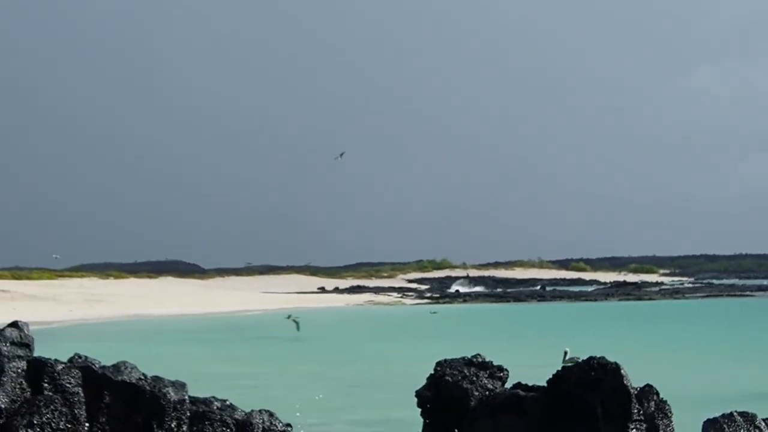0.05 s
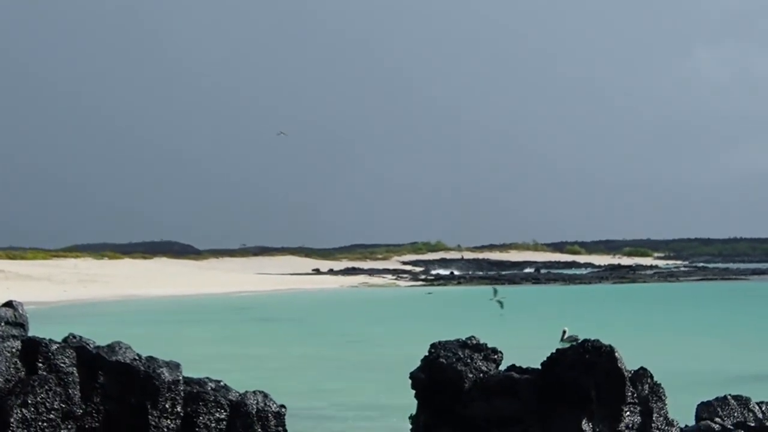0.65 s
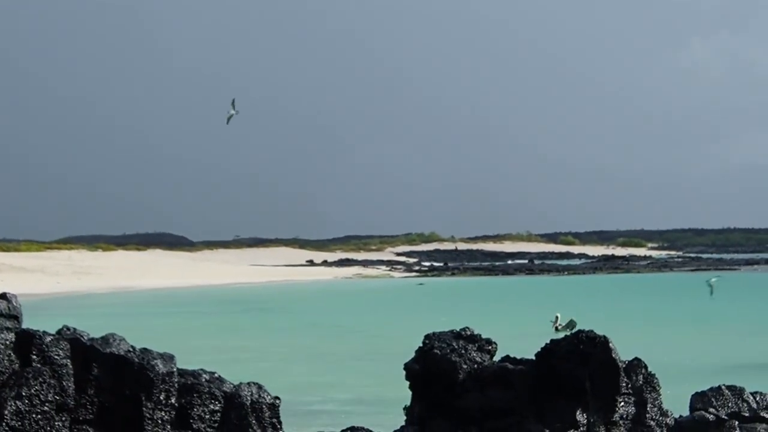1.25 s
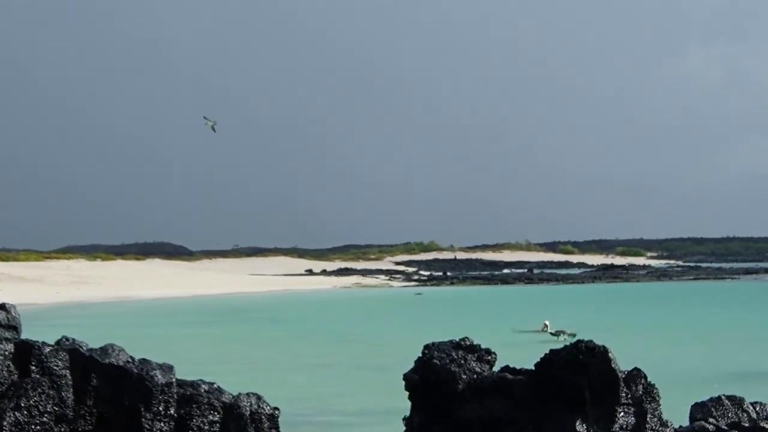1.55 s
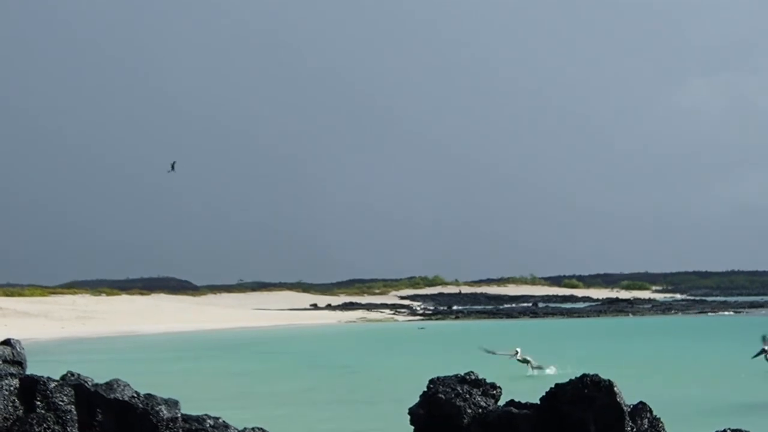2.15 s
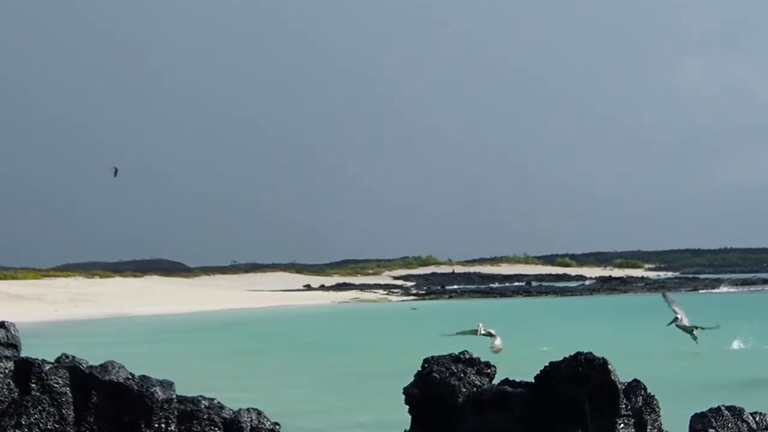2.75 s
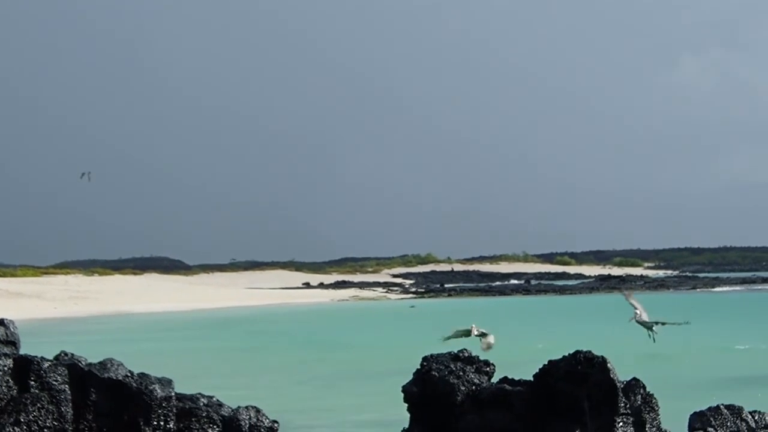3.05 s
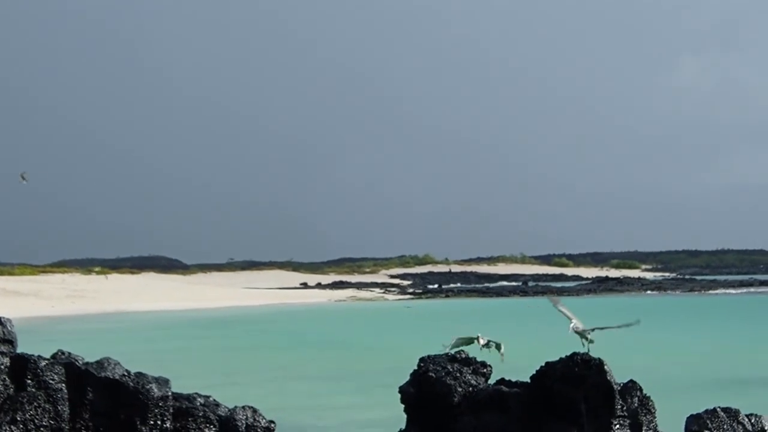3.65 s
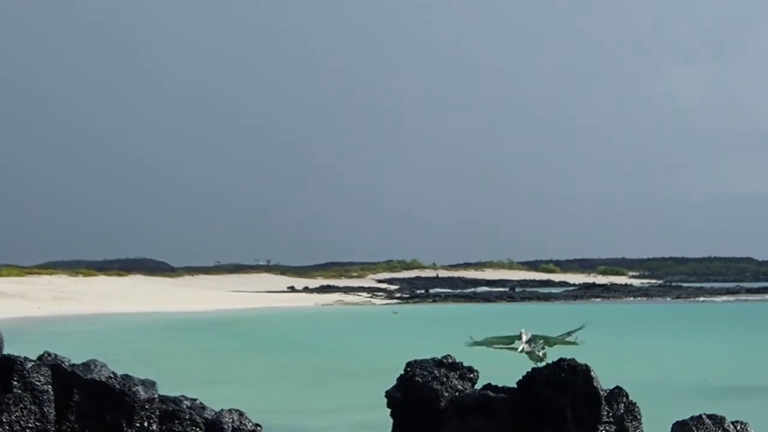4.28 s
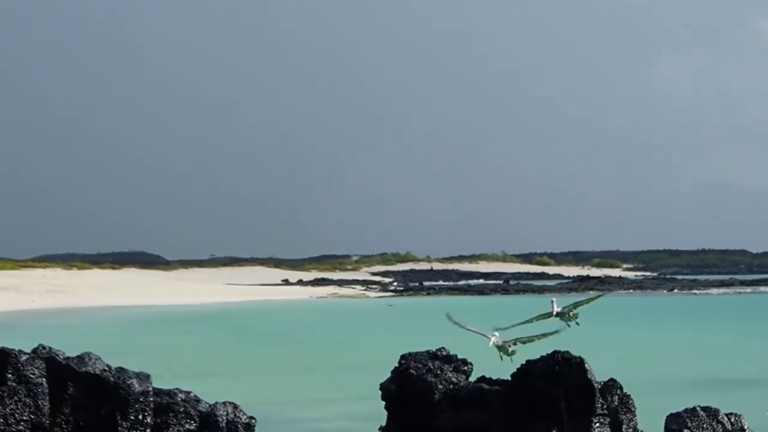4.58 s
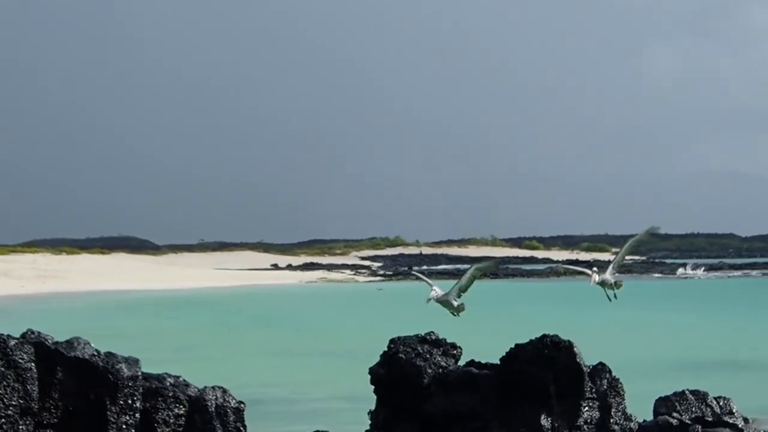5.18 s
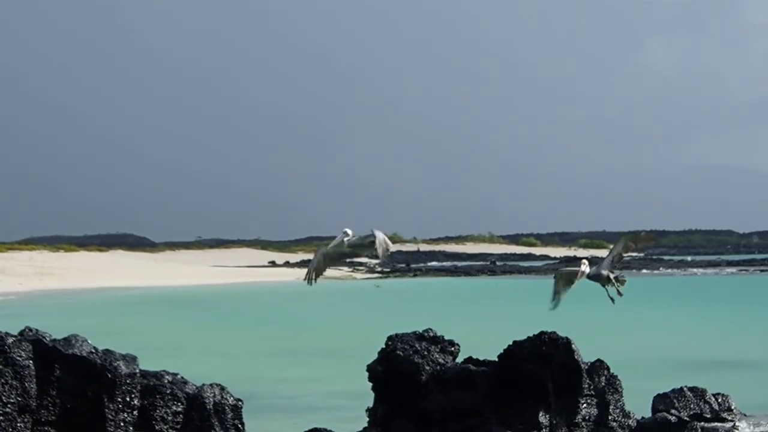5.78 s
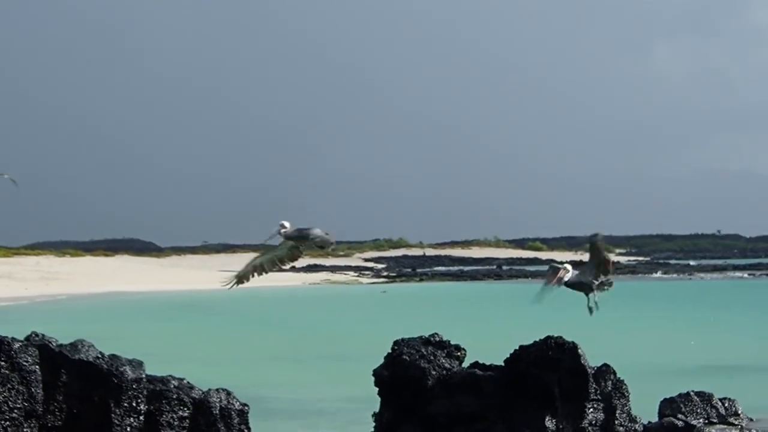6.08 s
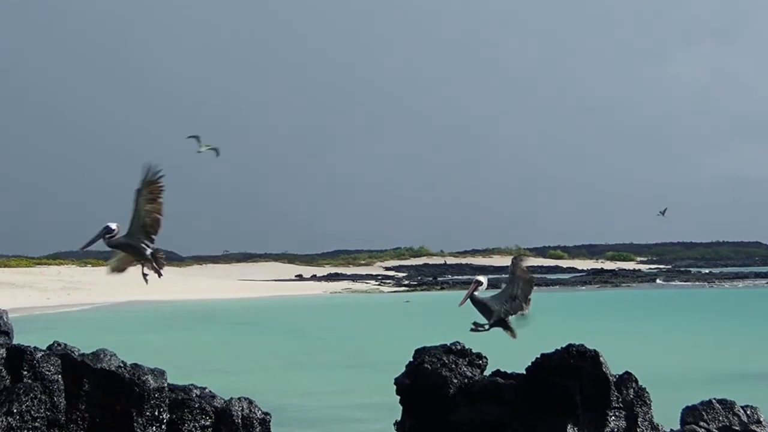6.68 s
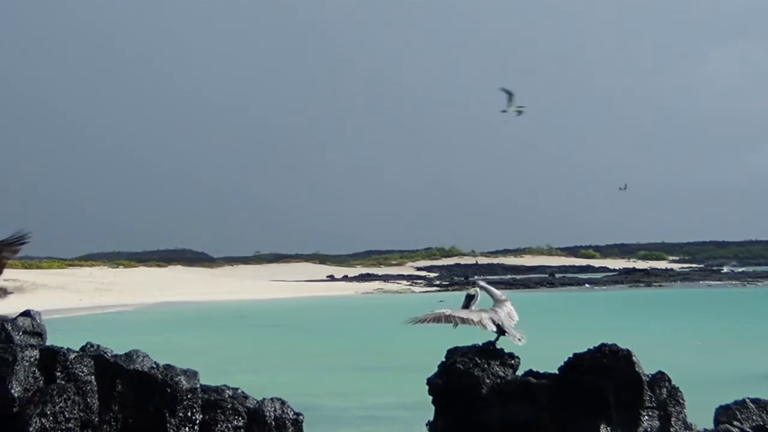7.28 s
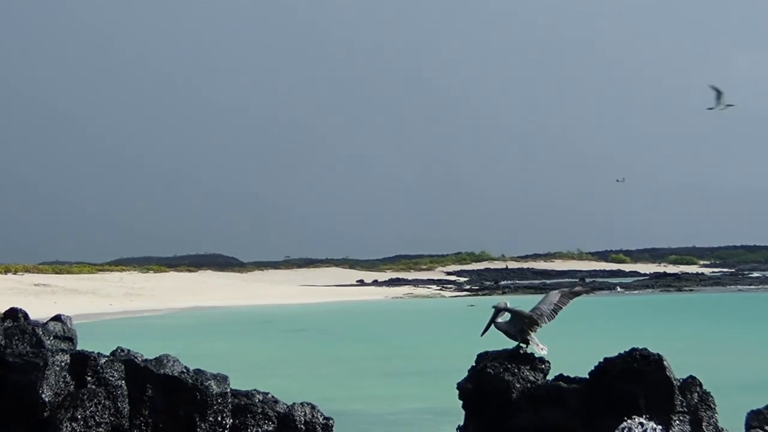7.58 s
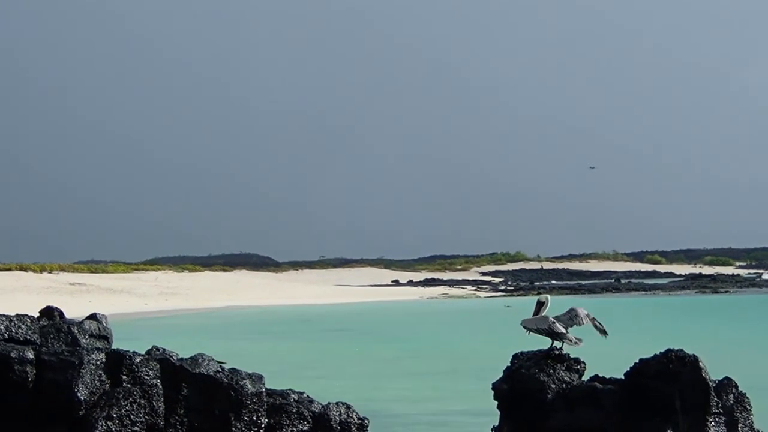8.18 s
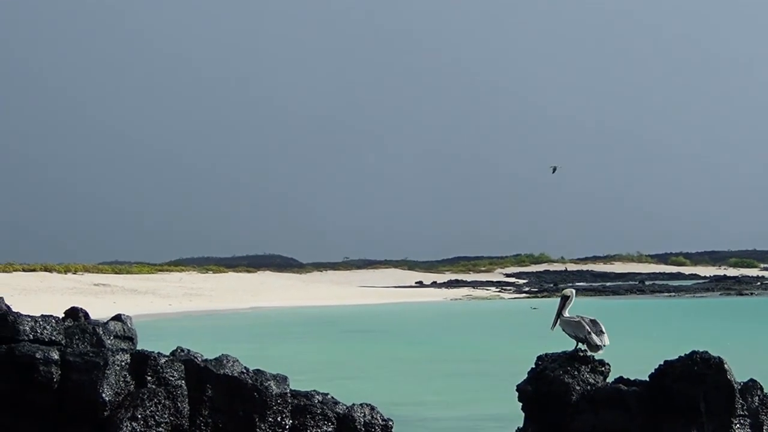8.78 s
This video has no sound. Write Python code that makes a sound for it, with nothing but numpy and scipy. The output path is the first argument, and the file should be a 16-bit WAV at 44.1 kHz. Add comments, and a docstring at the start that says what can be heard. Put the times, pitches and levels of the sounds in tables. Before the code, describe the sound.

Surf washes over shore rocks, heard through a wet microphone housing that makes it hollow and puts it mostly on the left; the right carries faint hiss and low wind rumble. The first wave surges immediately and holds until about 1.3 seconds, bubbling and fizzing, with brief slaps and low gulps. It drains into quieter foam while gusts buffet the microphone. A second, softer wave rises around 4 seconds, with slaps, gulps and tiny ticks of spray, then fades by 5. Wind gusts again through the lull. The third wave builds near 7 seconds and keeps washing until the end at about 9, with more slaps and a deeper churn and gulps just after 8. Throughout, single drops hit the housing with dull pops, the strongest at about 2.6 seconds on the left and 5.2 seconds on the right.

```python
"""Waves surge over shore rocks; foam fizzes and wind buffets between them. Each wave is a few overlapping
surges that rise, hold and drain: a cloud of ringing bubbles, with spray above and gulps of trapped air below.
The microphone sits in a wet housing: the left port rings, the right is nearly sealed, and drops pop on both."""
import sys
import numpy as np
from scipy import signal
from scipy.fft import rfft, irfft
from scipy.io import wavfile

SR = 44100
rng = np.random.default_rng(int(sys.argv[2]) if len(sys.argv) > 2 else 0)


def unload_audio(sound):
    """Save the sound as a 16-bit wav file, at the path given as the first command line argument."""
    columns = np.transpose(np.atleast_2d(sound))
    # keep every value between -1 and 1, then stretch to whole-number steps
    steps = np.round(np.clip(columns, -1, 1) * 32767)
    wavfile.write(sys.argv[1], SR, steps.astype(np.int16))


N = 398655

# breaking wave through the housing: (frequency [Hz], relative level [dB])
BREAKER_SPECTRUM = [(250, -33), (470, -9), (590, -8), (690, -10), (820, -1), (1000, -2.5), (1350, 0),
                    (1580, 1.5), (1800, -2.5), (2000, -8.5), (2200, -10), (2570, -22.5), (3200, -39),
                    (4500, -67)]
# spray through the housing: (frequency [Hz], relative level [dB])
SPRAY_SPECTRUM = [(2000, -2), (3160, -7.5), (3620, -3.5), (4170, -8), (4880, -2.5), (5800, -7), (6450, 0.5),
                  (6800, 0.5), (7650, -13.5), (8600, -6.5), (9400, -16), (10200, -39), (11200, -72)]


def surf(churn_lag_s=0.031):
    """Surges drive wash, spray and churn; foam lingers, large bubbles surface late and stop first."""
    # (start [s], rise [s], hold [s], wash [dB], spray [dB], churn [dB]), before port gain
    surges = [(-0.1, 0.15, 0.16, -25.5, -40.5, -36), (0.26, 0.49, .3, -21.5, -36.5, -33.5),
              (1.056, 0.19, 0.048, -22, -37.5, -31), (1.464, 0.041, 0.02, -32.5, -41, -52),
              (1.61, 0.95, .55, -35.5, -44.5, -50.5), (3.872, 0.11, 0.058, -32.5, -43, -56),
              (3.95, .3, 0.42, -27.5, -39.5, -40.5), (4.47, 0.096, 0.17, -29, -41.5, -44),
              (5.9, 0.95, 0.22, -35, -53, -46), (6.95, 0.067, .02, -28.5, -39.5, -52),
              (6.97, 0.31, 2.3, -24, -40, -37), (7.998, 0.21, .05, -25, -43.5, -31.5),
              (8.39, 0.26, 0.16, -24.5, -40.5, -38.5)]
    start, rise, hold, wash_db, spray_db, churn_db = np.transpose(surges)
    wash_db = swells(zip(start, rise, hold, wash_db), calm_db=-37.5, fall_db_per_s=29.5)
    spray_db = swells(zip(start, rise, hold, spray_db), calm_db=-50.5, fall_db_per_s=24.5)
    churn_db = swells(zip(start + churn_lag_s, rise, hold, churn_db), calm_db=-52, fall_db_per_s=43)
    return wash(wash_db) + spray(spray_db) + churn(churn_db)


def wash(level_db, far_db=6.5, flicker_db=0.69, calm_db=-36, breaking_db=-28):
    """Near bubbles over the rush of countless far ones; a breaker rings more hollowly than backwash."""
    # (frequency [Hz], relative level [dB])
    backwash_spectrum = [(250, -13.5), (450, -7), (600, -1), (690, -5), (810, 1), (970, -3.5), (1170, 2.5),
                         (1550, 0.5), (1780, 0), (2000, -5), (2200, -8), (2570, -19), (4500, -67)]
    near = bubble_cloud(2400, 454, 3130, t60_cycles=15, spread_db=-0.5, clump_db=2.2)
    rush = near + from_db(far_db) * rng.standard_normal(N)
    breaker = rms_one(coloured(rush, BREAKER_SPECTRUM))
    backwash = rms_one(coloured(rush, backwash_spectrum))
    breaking = np.clip((level_db - calm_db) / (breaking_db - calm_db), 0, 1)
    water = breaking * breaker + (1 - breaking) * backwash
    return water * from_db(level_db + flicker_db * drift(28))


def spray(level_db, mist_db=6.5, drops_db=-14.5, flicker_db=1.0):
    """Tiny bubbles burst in the foam and single drops fall back, over a fine hiss."""
    fizz = bubble_cloud(2500, 2390, 10460, t60_cycles=11, spread_db=3.5, clump_db=0.5)
    drops = bubble_cloud(110, 3500, 6720, t60_cycles=25, spread_db=4, clump_db=0, pitch_count=12)
    mist = from_db(mist_db) * rng.standard_normal(N)
    foam = rms_one(coloured(fizz + from_db(drops_db) * drops + mist, SPRAY_SPECTRUM))
    return foam * from_db(level_db + flicker_db * drift(8.4))


def churn(level_db, rumble_db=7.5):
    """Large bubbles tumble under the breaking wave."""
    # (frequency [Hz], relative level [dB])
    churn_spectrum = [(50, -42), (110, -9), (180, -2), (280, -0.5), (385, -1.5), (470, -7), (700, -10.5),
                      (1500, -77)]
    deep = bubble_cloud(350, 99, 645, t60_cycles=13, spread_db=-1.5, clump_db=3)
    rumble = from_db(rumble_db) * rng.standard_normal(N)
    return from_db(level_db) * rms_one(coloured(deep + rumble, churn_spectrum))


def bubble_cloud(per_s, low_hz, high_hz, t60_cycles, spread_db, clump_db, pitch_count=24):
    """Bubbles of uneven size are born in clumps, each ringing briefly at its own pitch."""
    strengths = from_db(spread_db * np.minimum(rng.exponential(1, N), 4)) * rng.choice([-1, 1], N)
    births = strengths * (rng.random(N) < per_s * from_db(clump_db * drift(14)) / SR)
    pitch_index = rng.integers(0, pitch_count, N)
    rings = (hz ** 1.5 * ring(births * (pitch_index == k), hz, t60_cycles / hz)
             for k, hz in enumerate(np.geomspace(low_hz, high_hz, pitch_count)))
    return rms_one(sum(rings))


def slaps(decay_s=0.0023):
    """Water slaps rock in brief bursts."""
    # (time [s], peak before port gain [dB])
    hits = [(0.532, -17), (0.547, -12), (1.223, -12), (2.341, -14.5), (3.378, -19), (4.187, -15),
            (4.524, -14), (4.563, -11), (4.926, -18.5), (7.209, -11), (7.272, -11), (8.236, -13),
            (8.839, -11)]
    out = np.zeros(N)
    for time_s, peak_db in hits:
        add(out, time_s, peak_db, coloured(burst(decay_s), BREAKER_SPECTRUM))
    return out


def spits(decay_s=0.0032):
    """Drops of spray land close by."""
    # (time [s], peak before port gain [dB], pitch [Hz])
    landings = [(0.798, -23, 6600), (1.46, -28, 4980), (2.962, -32.5, 4440), (3.973, -32, 6650),
                (4.085, -31, 4100), (4.271, -26, 5000), (4.688, -27, 6700), (6.313, -37, 5100),
                (6.61, -39, 5540), (6.811, -24.5, 6540), (6.825, -35, 6700), (6.978, -32, 6500),
                (7.015, -25, 6340)]
    out = np.zeros(N)
    for time_s, peak_db, hz in landings:
        add(out, time_s, peak_db, tick(hz, decay_s, band_ratio=1.28))
    return out


def gulps(decay_cycles=3.7, glide_per_s=3.6, ring_gain=0.93):
    """Big air pockets close: a rough slosh and a ring that rises as the air nears the surface."""
    # (time [s], peak before port gain [dB], starting pitch [Hz])
    pockets = [(0.868, -19, 372), (0.964, -18.5, 257), (1.119, -19, 118), (1.272, -22, 324),
               (1.326, -30, 187), (2.731, -30.5, 186), (4.202, -17, 300), (4.531, -26.5, 199),
               (4.626, -20, 300), (8.209, -17, 369), (8.541, -25, 270), (8.613, -20.5, 342)]
    out, t = np.zeros(N), np.arange(SR // 10) / SR
    for time_s, peak_db, hz in pockets:
        cycles = hz * t * (1 + glide_per_s * t)
        slosh = rms_one(bandpass(rng.standard_normal(len(t)), hz / 1.25, hz * 1.53))
        envelope = (1 - np.exp(-cycles)) * np.exp(-cycles / decay_cycles)
        add(out, time_s, peak_db, envelope * (slosh + ring_gain * np.sin(2 * np.pi * cycles)))
    return out


def port_pops(band_ratio=2.27):
    """A drop shoves a port's membrane once: a dull, heavily damped knock."""
    # (time [s], peak [dB], nominal pitch [Hz], port [0 left, 1 right])
    pops = [(0.0307, -12.5, 225, 1), (0.6804, -28, 320, 1), (1.5867, -25, 477, 1), (2.0687, -31, 213, 1),
            (2.4312, -26, 210, 1), (2.5617, -7.5, 860, 0), (3.3875, -22, 403, 1), (4.0854, -20, 280, 1),
            (4.524, -23, 740, 1), (4.9053, -22, 700, 1), (5.2115, -5, 250, 1), (5.7573, -16, 456, 1),
            (6.6356, -18, 670, 1), (7.8117, -25, 380, 1)]
    out, impulse = np.zeros((2, N)), signal.unit_impulse(SR // 10)
    for time_s, peak_db, hz, port in pops:
        centre_hz = hz / 1.62
        knock = bandpass(impulse, centre_hz / band_ratio, centre_hz * band_ratio)
        add(out[port], time_s, peak_db, lowpass(knock, 1.9 * hz, order=2))
    return out


def housing_tick(time_s=2.5573, peak_db=-19):
    """One drop strikes the housing and reaches both ports."""
    out = np.zeros((2, N))
    for channel in out:
        add(channel, time_s, peak_db, tick(hz=8400, decay_s=0.0005, band_ratio=1.1))
    return out


def tick(hz, decay_s, band_ratio):
    """A tiny splash: a puff around one pitch, heard through the housing."""
    return coloured(bandpass(burst(decay_s), hz / band_ratio, hz * band_ratio), SPRAY_SPECTRUM)


def wind(gust_rise_s=0.066, sealed_db=-45):
    """Gusts over a breeze buffet the open port; a low rumble is felt through the sealed one."""
    # (start [s], hold [s], level before port gain [dB])
    gusts = [(0.536, .55, -46), (1.644, 0.51, -46.5), (2.66, 0.24, -48), (3.27, 0.13, -43.5),
             (5.2, .6, -45.5), (5.9, 0.61, -47.5), (8.16, 0.027, -50)]
    # open and sealed port: (frequency [Hz], relative level [dB])
    buffet_spectrum = [(10, -35), (25, -36), (50, -10.5), (90, -3), (150, -5), (300, -14), (700, -25),
                       (2000, -79)]
    rumble_spectrum = [(10, 4.5), (25, -22), (45, -9), (85, -7), (150, -10.5), (300, -16.5), (700, -24.5),
                       (2000, -84)]
    rows = [(start_s, gust_rise_s, hold_s, db) for start_s, hold_s, db in gusts]
    open_db = swells(rows, calm_db=-54, fall_db_per_s=49)
    buffet = turbulence(open_db, buffet_spectrum, lumpy_db=4.5)
    return buffet, turbulence(sealed_db, rumble_spectrum, lumpy_db=2.5)


def turbulence(level_db, spectrum, lumpy_db):
    """Lumpy wind noise on one port."""
    gain = from_db(level_db + lumpy_db * drift(3.2))
    return gain * rms_one(coloured(rng.standard_normal(N), spectrum))


def swells(rows, calm_db, fall_db_per_s):
    """Level in dB of overlapping swells over a calm bed; each rises, holds and dies away."""
    t, power = np.arange(N) / SR, from_db(calm_db) ** 2
    for start_s, rise_s, hold_s, db in rows:
        attack = np.clip((t - start_s) / rise_s, 0, 1)
        release_db = fall_db_per_s * np.maximum(t - start_s - rise_s - hold_s, 0)
        power = power + (attack * from_db(db - release_db)) ** 2
    return 10 * np.log10(power)


def burst(decay_s):
    """A puff of noise that swells and dies."""
    age = np.arange(SR // 10) / SR / decay_s
    return rng.standard_normal(len(age)) * (1 - np.exp(-2 * age)) * np.exp(-age)


def ring(clicks, hz, t60_s):
    """Each click starts a decaying sine."""
    r, w = from_db(-60 / (t60_s * SR)), 2 * np.pi * hz / SR
    return signal.lfilter([0, np.sin(w)], [1, -2 * r * np.cos(w), r * r], clicks + 1e-18)


def drift(corner_hz, hop=40, warmup=2000):
    """Slow random wander, rms 1."""
    r = np.exp(-2 * np.pi * corner_hz * hop / SR)
    white = rng.standard_normal(N // hop + warmup + 2)
    slow = signal.lfilter([1], [1, -2 * r, r * r], white)[warmup:]
    return np.interp(np.arange(N) / hop, np.arange(len(slow)), rms_one(slow))


def coloured(x, spectrum, taps=8192):
    """Minimum-phase filter from (frequency [Hz], gain [dB]) points."""
    hz, db = np.transpose(spectrum)
    grid_hz = np.maximum(np.fft.rfftfreq(taps, 1 / SR), 1)
    gain = from_db(np.interp(np.log(grid_hz), np.log(hz), db))
    cepstrum = irfft(np.log(gain))
    cepstrum[1:taps // 2] *= 2
    cepstrum[taps // 2 + 1:] = 0
    return signal.oaconvolve(x, irfft(np.exp(rfft(cepstrum))))[:len(x)]


def bandpass(x, low_hz, high_hz):
    return signal.sosfilt(signal.butter(2, [low_hz, high_hz], "band", fs=SR, output="sos"), x)


def lowpass(x, hz, order):
    return signal.sosfilt(signal.butter(order, hz, fs=SR, output="sos"), x)


def add(out, time_s, peak_db, sound):
    start = round(time_s * SR)
    part = sound[:N - start]
    out[start:start + len(part)] += from_db(peak_db) * part / np.abs(sound).max()


def from_db(db):
    return 10 ** (np.asarray(db) / 20)


def rms_one(x):
    return x / np.sqrt(np.mean(x ** 2) + 1e-20)


def scene(port_gain_db=6.5, shared_fraction=0.85, shared_below_hz=2500, lag_samples=5):
    """The right port hears the left's low water faintly and later, with a treble of its own."""
    # sealed right port: (frequency [Hz], gain relative to left [dB])
    seal_response = [(130, -18), (300, -28), (700, -30), (1450, -29.5), (1750, -37), (2300, -36),
                     (3000, -35), (3800, -30), (4800, -16.5), (5600, -10), (6600, -16.5), (7600, -12),
                     (8500, -18.5), (9600, -3)]
    water = surf() + slaps() + spits() + gulps()
    other_water = surf()
    delayed = np.pad(water, (lag_samples, 0))[:N]
    right_water = other_water + shared_fraction * lowpass(delayed - other_water, shared_below_hz, order=1)
    buffet, rumble = wind()
    left = from_db(port_gain_db) * (water + buffet)
    right = from_db(port_gain_db) * coloured(right_water, seal_response) + rumble
    return np.array([left, right]) + port_pops() + housing_tick()


def record(dry, hiss_db=-52, cutoff_hz=15800):
    """Microphone self-noise, then a steep treble cut."""
    # (frequency [Hz], relative level [dB])
    hiss_spectrum = [(3000, -11), (4000, -29), (5000, -2), (9000, 11.5), (10300, -2.5), (11000, -0.5),
                     (16000, -1)]
    hiss = np.array([rms_one(coloured(white, hiss_spectrum)) for white in rng.standard_normal((2, N))])
    treble_cut = signal.ellip(14, 0.1, 100, cutoff_hz, fs=SR, output="sos")
    return signal.sosfilt(treble_cut, dry + from_db(hiss_db) * hiss)


dry = scene()
out = record(dry)
unload_audio(out)
```